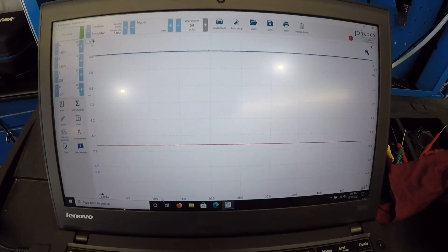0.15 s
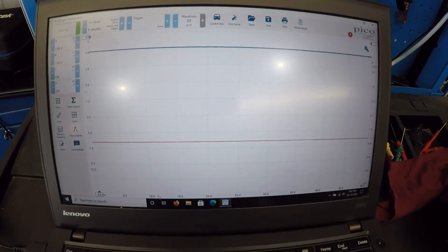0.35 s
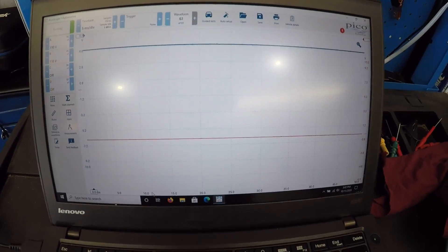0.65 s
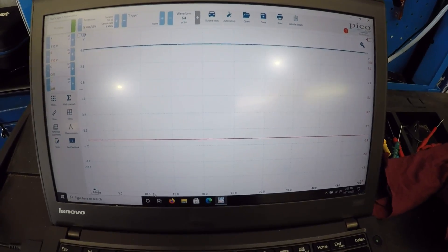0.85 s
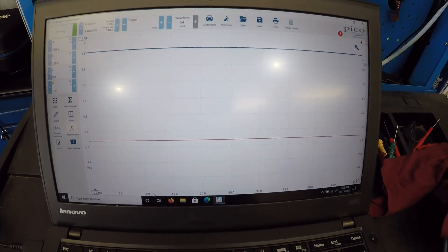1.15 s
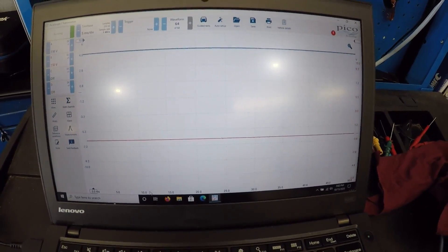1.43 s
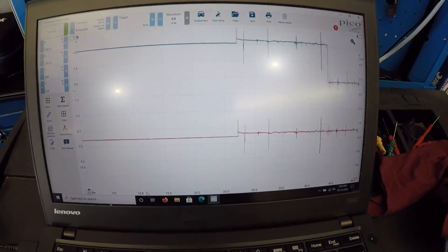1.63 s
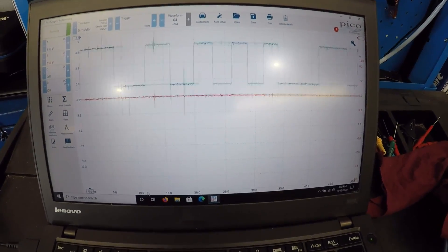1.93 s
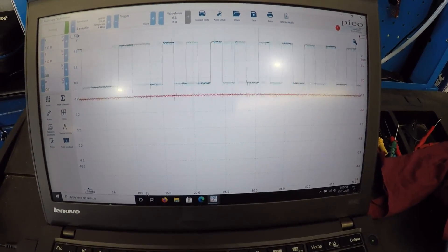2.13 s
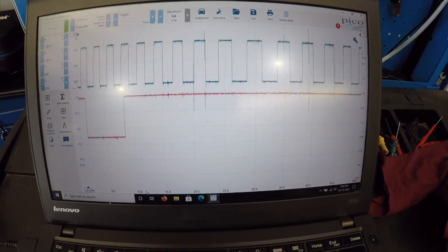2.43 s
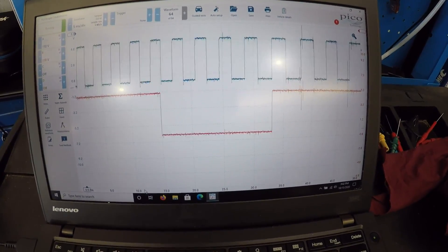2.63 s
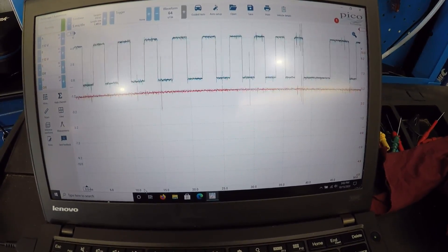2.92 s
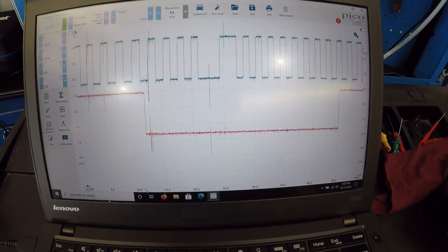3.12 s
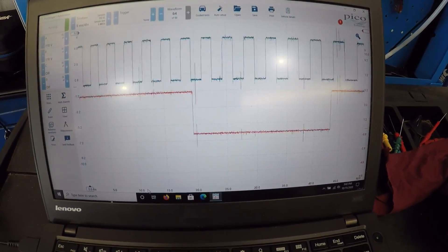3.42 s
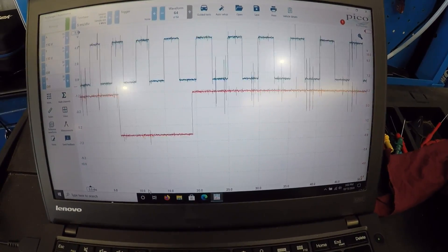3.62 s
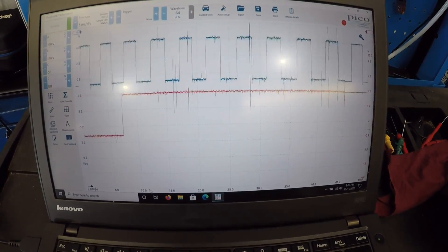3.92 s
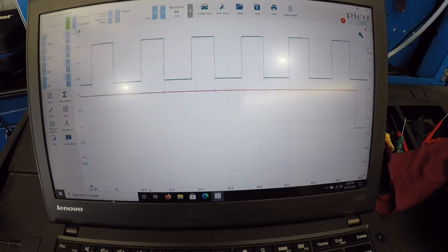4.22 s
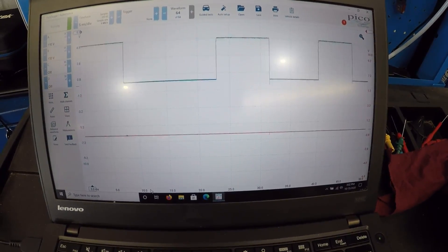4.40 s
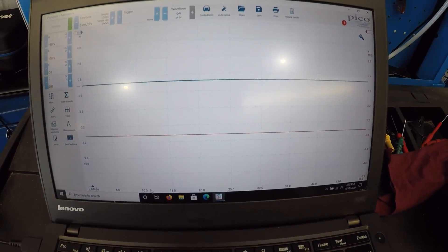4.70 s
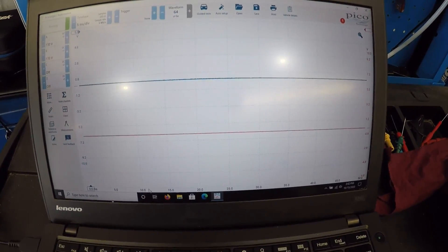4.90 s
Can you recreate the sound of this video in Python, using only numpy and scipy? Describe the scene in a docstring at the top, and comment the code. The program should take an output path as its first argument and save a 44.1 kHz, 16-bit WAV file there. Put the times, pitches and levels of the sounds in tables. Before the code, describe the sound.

A quiet fan hum opens the scene, then loud starter gears grind and groan in a pulsing rhythm. The diesel engine knocks roughly, with rattling metal and bright hiss, close to the microphone, which catches low air buffeting and short room reflections. After about two seconds it stops abruptly; a thin whine coasts down, with a brief faint rub, then two hard snaps, the first much stronger and hollow.

```python
"""A fan drone with a wavering hum and a soft rush, all filtered noise and sines, fills a workshop; a thin hiss passes.
A starter clashes into a diesel car engine (noise bursts) and groans through three compressions (gliding tones).
The engine catches with uneven knocks (short rings), tapping clatter, clanks and hiss, and air buffets the microphone.
It dies while a rotor's whine runs down (fluttering partials) and something squeals faintly.
Two sharp clicks follow close by: noise snaps that ring a hollow case."""
import sys
import numpy as np
from scipy import signal
from scipy.fft import rfft, irfft
from scipy.io import wavfile
from scipy.ndimage import uniform_filter1d

SR = 44100
rng = np.random.default_rng(int(sys.argv[2]) if len(sys.argv) > 2 else 0)


def put_to_file(sound):
    """Save the sound as 16-bit audio at rate SR, in the file named by the first command-line argument."""
    columns = np.atleast_2d(sound).T  # one column per channel
    safe = np.clip(columns, -1, 1)
    whole_steps = np.round(safe * 32767)
    wavfile.write(sys.argv[1], SR, whole_steps.astype(np.int16))


N = 222763
T = np.arange(N) / SR
FREQ = np.maximum(np.arange(N // 2 + 1) * SR / N, 1)
SIDES = np.array([[.5], [-.5]])  # left, right: half of each difference between the ports


def undb(db):
    """Decibels to gain."""
    return 10 ** (np.asarray(db) / 20)


def unit(x):
    """Scale to rms 1."""
    return x / np.sqrt(np.mean(x ** 2))


def curves(table):
    """Each column of a timed table at every sample."""
    s, *columns = np.transpose(table)
    return [np.interp(T, s, c) for c in columns]


def spectra(table):
    """Each column of a table by frequency at every bin, interpolated over log frequency."""
    hz, *columns = np.transpose(table)
    return [np.interp(np.log(FREQ), np.log(hz), c) for c in columns]


def colour(x, table, peaks=()):
    """Filter by a smooth spectrum with narrow resonances on top; rms 1."""
    db = spectra(table)[0]
    for hz, width, top in peaks:
        db = db + top * np.exp(-((FREQ - hz) / width) ** 2 * 2)
    return unit(irfft(rfft(x) * undb(db), N))


def walk(rate):
    """Smooth chance of spread 1 that changes about rate times a second."""
    return unit(irfft(rfft(rng.standard_normal(N)) * np.exp(-(FREQ / rate) ** 2), N))


def cycles(hz, waver, rate):
    """Phase of a tone whose pitch wavers by a small share."""
    return 2 * np.pi * np.cumsum(hz * (1 + waver * walk(rate))) / SR


# how sound reaches the two ports: (f/Hz, shared 0-1, left lead/rad, left minus right/dB)
PORT_PATHS = [(40, .94, 0, 2.8), (250, .97, 0, 2), (500, .75, .1, 2.8), (800, .55, -.8, -.5),
              (1200, .48, -.8, -3), (1800, .5, -.9, -1.3), (2800, .45, -.2, .5), (4200, .25, 0, 3.5),
              (5000, .08, -1, 3.5), (5700, .2, -3.1, 3), (7000, .2, -3.2, -2.4), (13000, .3, -3.2, .5)]


def air():
    """White noise at the two ports: a shared direct part and scattered parts."""
    shared, lead, pan_db = spectra(PORT_PATHS)
    noise = rfft(rng.standard_normal((3, N)))
    direct = np.sqrt(shared) * noise[0] * np.exp(1j * SIDES * lead)
    scattered = np.sqrt(1 - shared) * noise[1:]
    return irfft((direct + scattered) * undb(SIDES * pan_db), N)


def place(x, pan_db):
    """Set a sound between left and right."""
    return x * undb(SIDES * pan_db)


def burst(s, rise, hold, fall):
    """Envelope that rises, holds and dies away."""
    age = np.maximum(T - s, 0)
    return np.minimum(age / rise, 1) * np.exp(-np.clip((age - hold) / fall, 0, 40))


def bell(s, width):
    """Envelope that swells to 1 at a moment and fades again."""
    return np.exp(-((T - s) / width) ** 2)


def taps(rate, scatter_db, fall, steady):
    """Envelope of many small uneven impacts over a steady share."""
    hits = (rng.random(N) < rate / SR) * undb(scatter_db * np.clip(rng.standard_normal(N), -2, 2))
    power = signal.lfilter([1], [1, -np.exp(-2 / (fall * SR))], hits ** 2)
    return unit(np.sqrt(steady + power / power.mean()))


def reflect(x, t60, wet_db):
    """Add dense reflections, different at each port."""
    t = T[:SR // 2]
    tail = rng.standard_normal((2, len(t))) * 1000 ** (-t / t60) * (t > .004)
    tail /= np.sqrt(np.sum(tail ** 2, axis=1, keepdims=True))
    return x + undb(wet_db) * signal.fftconvolve(x, tail, axes=1)[:, :N]


# swell of the fan hum: (t/s, level/dB)
HUM_SWELL_CURVE = [(0, -1.5), (.55, 5.5), (.8, 5.5), (1.0, 7), (1.35, 7), (1.7, 9), (5, -12)]
# level of the rush, which sinks while the engine runs: (t/s, level/dB)
RUSH_SWELL_CURVE = [(0, 1), (.45, 2), (1.15, 1), (1.45, 4), (4.0, -8.5), (5.04, -1.5)]
# colour of the rush: (f/Hz, relative level/dB)
RUSH_COLOUR = [(100, -27), (160, -8), (270, -2), (330, -10), (390, -2.5), (450, -7.5), (620, -3.5),
               (1050, -4.5), (1550, -10.5), (2200, -15), (2900, -20.5), (4100, -26), (5000, -29),
               (7000, -26.5), (9500, -32), (14000, -44.5)]
# colour of the low drone: (f/Hz, relative level/dB)
DRONE_COLOUR = [(25, -32), (112, -50), (135, -7), (160, 2.5), (175, -5), (200, 3.5), (235, -3), (270, -13),
                (400, -20.5), (900, -60)]
RUSH_DB, DRONE_DB, HUM_HZ, HUM_DB = -40, -40, 194.9, -44.5  # rush and hum before their swells


def workshop():
    """Ventilation: a low drone with a wavering hum, under a soft rush."""
    phase = cycles(HUM_HZ, waver=0.0091, rate=8)
    hum_level = undb(HUM_DB + curves(HUM_SWELL_CURVE)[0] + 2.4 * walk(9.6))
    hum = hum_level * (np.sin(phase) + undb(-14.5) * np.sin(2 * phase))
    rush_level = undb(RUSH_DB + curves(RUSH_SWELL_CURVE)[0] + .5 * walk(2.3))
    rush = rush_level * colour(air(), RUSH_COLOUR)
    drone = undb(DRONE_DB) * colour(air(), DRONE_COLOUR)
    return rush + drone + place(hum, pan_db=3.0)


# colour of hissing flow: (f/Hz, relative level/dB)
HISS_COLOUR = [(1200, -28), (2600, -3.5), (3400, -4.5), (4200, -6.5), (5300, -3), (6200, 0.5), (7000, -2.5),
               (7800, -7.5), (8400, -10.5), (10000, -15.5), (11500, -28.5), (13500, -36.5), (15000, -63)]
FAINT_HISS_S, FAINT_HISS_WIDTH_S, FAINT_HISS_DB = 0.55, 0.37, -56  # centre, half length, peak


def faint_hiss():
    """A thin hiss that comes and goes while the engine still rests."""
    level = undb(FAINT_HISS_DB) * bell(FAINT_HISS_S, FAINT_HISS_WIDTH_S)
    return level * colour(air(), HISS_COLOUR)


LOAD_LAG_S, LOAD_WIDTH_S = 0.02, 0.027  # the load peaks this long after the fastest moment; half length


def gear_load(fastest_s):
    """Load on the starter in one compression, 0-1."""
    return bell(fastest_s + LOAD_LAG_S, LOAD_WIDTH_S)


GRIP_HZ, SAG_HZ_PER_S = 173.5, 2092  # gear pitch when slowest; how fast compression drags it down
UNLOADED_DB, RUN_UP_WHINE_DB = -11, -7.5  # relative to full load


def groan(grip_s, fastest_s, fastest_hz, groan_db, whine_db, boom_s):
    """The gears speed up from their grip, then sag and grow loud as the cylinder compresses."""
    run_up = np.sin(np.pi / 2 * np.clip((T - grip_s) / (fastest_s - grip_s), 0, 1)) ** 2
    hz = GRIP_HZ + (fastest_hz - GRIP_HZ) * run_up - SAG_HZ_PER_S * np.maximum(T - fastest_s, 0)
    # the flywheel's inertia smooths every change of speed
    smooth_hz = uniform_filter1d(np.maximum(hz, GRIP_HZ), size=SR // 80)
    phase = cycles(smooth_hz, waver=0.012, rate=85)
    # the teeth meet unevenly, which smears the higher partials into a growl
    growl = 0
    for k, db in enumerate([-10, -9, -12, -15], start=3):
        growl = growl + undb(db) * (.7 + .7 * walk(90)) * np.sin(k * phase)
    unloaded = undb(UNLOADED_DB) * np.sqrt(run_up) * burst(grip_s, 0.018, boom_s - grip_s, 0.047)
    force = np.maximum(gear_load(fastest_s), unloaded)
    # the octave whine already sings while the gears run up
    singing = np.maximum(force, undb(RUN_UP_WHINE_DB) * run_up * (T < fastest_s))
    low = force * (undb(groan_db) * np.sin(phase) + undb(whine_db) * growl)
    return low + singing * undb(whine_db) * np.sin(2 * phase)


# compressions on the starter, from the gears' grip to the boom at top dead centre:
# (grip t/s, clash level/dB, clash hold/s, clash treble level/dB, fastest t/s, fastest f/Hz,
#  groan level/dB, octave whine level/dB, boom t/s, boom f/Hz, boom level/dB, after-ring level/dB)
COMPRESSION_STROKES = [(1.498, -20.5, 0.015, 5.5, 1.712, 295, -16, -18, 1.766, 192, -7, -21),
                       (1.938, -19, 0.056, -15, 1.981, 337.5, -17, -17.5, 2.0, 298, -6.5, -16.5),
                       (2.114, -19, 0.036, -24, 2.153, 334, -28, -25, 2.169, 296, -7.5, -19)]
# colour of the pinion's clash: (f/Hz, relative level/dB)
PINION_COLOUR = [(40, -75), (90, -42), (170, -16), (370, -5), (480, 4), (700, 10), (900, -2), (1250, 2.5),
                 (2000, -18), (4000, -10.5), (7200, -9), (9000, -19), (14000, -44.5)]
# ringing of the block and its covers: (f/Hz, width/Hz, level/dB)
BLOCK_RESONANCES = [(303.3, 37, 8), (864, 17, 5.5), (994, 10, 4.5), (1036, 18, 6), (1130, 28, 3.5),
                    (1248, 90, 4), (1450, 35, 6), (1530, 26, 2.5), (1670, 37, 5), (1864, 90, 4),
                    (2035, 30, 6), (2184, 45, 4.5), (2287, 35, 6), (2470, 17, 2)]
# colour of the teeth grinding on: (f/Hz, relative level/dB)
GRIND_COLOUR = [(1200, -29), (2600, -2), (3600, -8), (5000, 0), (7000, -6), (12000, -38)]
START_S = 1.505
CLASH_TREBLE_HZ, CLASH_TREBLE_WIDTH_HZ = 7500, 6600  # broad treble lift or cut of each clash
GRIND_DB, GRIND_HOLD_S, GRIND_FALL_S = -33.5, 0.11, 0.065  # the teeth grind on after the first engagement
BOOM_WIDTH_S, BOOM_SAG_HZ_PER_S = 0.0095, 900
MOUNT_FALL_S, MOUNT_BEAT_HZ, MOUNT_BEAT_SHARE = 0.099, 22, 0.25


def starter():
    """The pinion clashes into the ring gear, then the gears groan under each compression."""
    clash, body = 0, 0
    teeth = air() * taps(rate=620, scatter_db=-4.0, fall=0.0018, steady=0.95)
    grit = undb(1.6 * walk(52))
    for (grip_s, clash_db, hold, treble_db, fastest_s, fastest_hz,
         groan_db, whine_db, boom_s, boom_hz, boom_db, after_db) in COMPRESSION_STROKES:
        treble = (CLASH_TREBLE_HZ, CLASH_TREBLE_WIDTH_HZ, treble_db)
        metal = colour(teeth, PINION_COLOUR, [*BLOCK_RESONANCES, treble])
        clash = clash + undb(clash_db) * burst(grip_s, 0.015, hold, 0.043) * metal
        gears = grit * groan(grip_s, fastest_s, fastest_hz, groan_db, whine_db, boom_s)
        # near top dead centre the crank almost stalls and the whole block heaves
        age = T - boom_s
        swell = bell(boom_s, BOOM_WIDTH_S)
        heave = swell * np.cos(2 * np.pi * (boom_hz - BOOM_SAG_HZ_PER_S * age / 2) * age)
        # then it throbs on in its mounts
        beat = 1 + MOUNT_BEAT_SHARE * np.cos(2 * np.pi * MOUNT_BEAT_HZ * age)
        throb = grit * burst(boom_s, 0.013, 0.024, MOUNT_FALL_S) * beat
        after_ring = throb * (1 - swell) * np.cos(cycles(boom_hz, waver=0.0518, rate=113))
        body = body + gears * (1 - swell) + undb(boom_db) * heave + undb(after_db) * after_ring
    grind_level = undb(GRIND_DB) * burst(START_S, 0.0071, GRIND_HOLD_S, GRIND_FALL_S)
    grind = grind_level * colour(teeth, GRIND_COLOUR)
    return clash + grind + reflect(place(body, pan_db=2.0), t60=0.27, wet_db=-21)


DIP_RISE_S, DIP_HOLD_S, DIP_FALL_S = 0.027, 0.033, 0.025


def dip(s):
    """Shape of the brief dip in level that follows a loud moment, 0-1."""
    return burst(s, DIP_RISE_S, DIP_HOLD_S, DIP_FALL_S)


# firings that knock:
# (t/s, ring f/Hz, ring level/dB, hold/s, rattle level/dB, rebound t/s, rebound level/dB)
FIRING_KNOCKS = [(2.323, 512, -13, 0.011, -23, 2.347, -18), (2.409, 491, -10, 0.011, -19, 2.429, -13),
                 (2.519, 488, -13, 0.0098, -19, 2.539, -13), (2.773, 525, -9, 0.014, -22, 2.793, -6.5),
                 (2.875, 486, -11.5, 0.012, -19, 2.905, -17), (3.117, 541.5, -9, 0.014, -22.5, 3.139, -9),
                 (3.214, 503.4, -15.5, 0.016, -19, 3.232, -12), (3.332, 479, -7, 0.0071, -21, 3.351, -14.5),
                 (3.448, 484, -12, .009, -20, 3.466, -17), (3.705, 514.5, -9, .014, -22.5, 3.725, -9),
                 (3.805, 496, -10.5, 0.0094, -19.5, 3.82, -11.5)]


def knock_dips():
    """The dips after all knocks, deeper for stronger and longer ones, scaled by the strongest."""
    strengths = [undb(db) * np.sqrt(hold) for s, hz, db, hold, *_ in FIRING_KNOCKS]
    dips = sum(size * dip(s) for size, (s, *_) in zip(strengths, FIRING_KNOCKS))
    return dips / max(strengths)


# how hard the engine works as it is cranked, catches and dies: (t/s, level/dB)
EFFORT_CURVE = [(1.52, -2.5), (1.6, -4.5), (1.75, -2), (1.84, -5.5), (1.92, -4), (2.0, -0.5), (2.95, -1.5),
                (3.85, -0.7), (4.01, -7), (4.22, -15.5), (4.68, -22.5), (5.04, -33)]
# the engine surges: (t/s, half length/s, hiss level/dB, draught level/dB, clatter level/dB)
ENGINE_SURGES = [(2.266, 0.1, 2, 0, 0), (2.64, 0.077, 3, 1, 1.5), (2.98, 0.07, 2.5, 3, 2),
                 (3.57, 0.042, 2.5, 7, 1.5)]
# colour of taps on the block: (f/Hz, relative level/dB)
BLOCK_COLOUR = [(40, -62), (105, -58), (140, -5), (175, 5.5), (290, -4), (370, -3.5), (520, 0.5), (720, -3),
                (900, -3), (1150, 0.5), (1450, -4.5), (2200, -4.5), (3000, -11.5), (4200, -20.5),
                (8000, -75)]
# narrow resonances of the hissing parts: (f/Hz, width/Hz, level/dB)
HISS_RESONANCES = [(5905, 170, 6.5), (6516, 72, 7.5), (7620, 170, 6.5), (9120, 160, 5), (10200, 200, 2.5)]
CLATTER_DB, LOAD_CLATTER_DB = -20.5, 1.5  # at 0 dB effort; rise under the starter's load
HISS_DB, HISS_FOLLOWS = -24, 0.81  # at 0 dB effort; dB per dB of effort
CATCH_S, CRANKING_HISS_DB = 2.27, -2  # the hiss is weaker until the engine catches
CLATTER_DIP_DB, HISS_DIP_DB, BOOM_DIP_DB = -2, -4, -3  # after knocks; the last: hiss after booms
# the clatter slackens as each compression slows the crank before a stroke
LULL_LEAD_S, LULL_WIDTH_S, LULL_DB = 0.028, 0.02, -2.5


def engine():
    """Valves, gears and injectors tap on the block; belts and intake hiss. Both follow the effort."""
    running = np.clip((T - START_S) / 0.004, 0, 1)
    cranking = np.clip((CATCH_S - T) / 0.09, 0, 1)
    effort_db, after_knock = curves(EFFORT_CURVE)[0], knock_dips()
    after_boom = sum(dip(boom_s) for *_, boom_s, hz, db, after_db in COMPRESSION_STROKES)
    load = sum(gear_load(fastest_s) for _, _, _, _, fastest_s, *_ in COMPRESSION_STROKES)
    # a compression's row starts at the gears' grip, a knock's at the firing
    strokes = [*COMPRESSION_STROKES, *FIRING_KNOCKS]
    lull = sum(bell(s - LULL_LEAD_S, LULL_WIDTH_S) for s, *_ in strokes)
    hiss_surge_db = sum(db * bell(s, width) for s, width, db, *_ in ENGINE_SURGES)
    clatter_surge_db = sum(db * bell(s, width) for s, width, *_, db in ENGINE_SURGES)

    tapping = air() * taps(rate=220, scatter_db=5, fall=0.013, steady=3.9)
    clatter = colour(tapping, BLOCK_COLOUR, BLOCK_RESONANCES)
    clatter_db = CLATTER_DB + effort_db + LOAD_CLATTER_DB * load + LULL_DB * lull
    clatter_db = clatter_db + CLATTER_DIP_DB * after_knock + clatter_surge_db

    # the hiss rings in its narrow resonances more while the flow is strong
    flow = air() * taps(rate=170, scatter_db=-7.0, fall=0.0036, steady=16.0)
    ringing = np.clip(undb(0.39 * effort_db), 0, 1)
    hiss = ringing * colour(flow, HISS_COLOUR, HISS_RESONANCES) + (1 - ringing) * colour(flow, HISS_COLOUR)
    hiss_db = HISS_DB + HISS_FOLLOWS * effort_db + CRANKING_HISS_DB * cranking + hiss_surge_db
    hiss_db = hiss_db + HISS_DIP_DB * after_knock + BOOM_DIP_DB * after_boom
    return running * (clatter * undb(clatter_db) + hiss * undb(hiss_db))


# loose metal that clanks around the main strokes: (t/s, ring f/Hz, ring level/dB, rattle level/dB, hold/s)
LOOSE_CLANKS = [(1.508, 1160, -22, -31, 0.0065), (1.744, 1249, -30.5, -28, 0.033),
                (1.859, 1093, -23.5, -40, 0.017), (2.12, 1220, -28.5, -24.5, .012),
                (2.255, 1235, -23, -31, 0.0089), (2.326, 1228, -17.5, -35, 0.011),
                (2.468, 522, -26, -21.5, 0.014), (2.563, 562, -23, -21, 0.011),
                (2.703, 1240, -26, -27, 0.0091), (2.838, 518, -28, -23, 0.013),
                (3.111, 1127, -24, -36, 0.0066), (3.18, 520, -20.5, -24, 0.008),
                (3.243, 510, -27, -27, 0.0057), (3.29, 1120, -28, -31, .015), (3.38, 508, -26, -27, 0.021),
                (3.489, 578, -28, -23, 0.012), (3.762, 525, -25, -25, 0.015), (3.829, 520, -24, -28, 0.011)]
# colour of rattling metal: (f/Hz, relative level/dB)
RATTLE_COLOUR = [(80, -50), (300, -17), (460, 8), (600, 8), (750, -2), (1050, 3), (1300, -2), (1750, 2.5),
                 (2400, -18), (4500, -29), (10000, -66)]


def clanks():
    """Loose metal is thrown back: a short gritty ring in a rattle."""
    tone, shake = 0, 0
    for s, hz, db, rattle_db, hold in LOOSE_CLANKS:
        blow = burst(s, 0.0037, hold, 0.012)
        tone = tone + undb(db) * blow * np.sin(2 * np.pi * hz * (T - s))
        shake = shake + undb(rattle_db) * blow
    rattle = shake * colour(air(), RATTLE_COLOUR, BLOCK_RESONANCES)
    gritty = tone * undb(1.7 * walk(150))
    return reflect(place(gritty, pan_db=5.0), t60=0.22, wet_db=-20) + rattle


# the engine lurches in its mounts under the starter: (t/s, half length/s, f/Hz, level/dB)
MOUNT_LURCHES = [(1.531, 0.013, 179.6, -20.5), (1.81, 0.0069, 213, -16), (1.855, 0.0087, 200, -16.5)]


def lurch():
    """The block swings in its mounts with a low throb."""
    throb = 0
    for s, width, hz, db in MOUNT_LURCHES:
        throb = throb + undb(db) * bell(s, width) * np.sin(cycles(hz, waver=0.027, rate=77))
    return place(throb, pan_db=2.0)


# moving air on the microphone, before the surges: (t/s, level/dB)
DRAUGHT_CURVE = [(2.2, -55), (2.34, -36.5), (2.52, -38.5), (2.62, -29.5), (3.83, -25), (4.07, -29.5),
                 (4.4, -33), (4.75, -32.5)]
# colour of the buffeting: (f/Hz, relative level/dB)
BUFFET_COLOUR = [(12, -3.5), (32, -1.5), (48, -2), (65, -8), (110, -8.5), (200, -13), (290, -22.5),
                 (400, -53), (1000, -68)]


def draught():
    """Air stirred by the engine buffets the microphone as low noise, lifted by the later surges."""
    surge_db = sum(db * bell(s, width) for s, width, _, db, _ in ENGINE_SURGES)
    level = undb(curves(DRAUGHT_CURVE)[0] + surge_db)
    onset = np.clip((T - DRAUGHT_CURVE[0][0]) / 0.042, 0, 1)
    return colour(air(), BUFFET_COLOUR) * level * onset


# harmonics of a knock's ring, from the first up:
# (level/dB, left minus right/dB, left lead/rad, roughness 0-1)
KNOCK_HARMONICS = [(0, 3.4, -0.055, 0.08), (-12, -12, -0.82, 0.48), (-12, 0, -1.3, 0.5)]
KNOCK_SAG_PER_S = 0.93  # share of its pitch that a knock's ring loses per second
REBOUND_WIDTH_S = 0.0046  # half length of a knock's rebound


def knocks():
    """Each firing drives a hollow ring near 500 Hz that rebounds once and stops short, and shakes metal."""
    rings, shake = 0, 0
    drift = cycles(1, waver=0.024, rate=310)
    grit = [(1 - rough / 2) + rough * walk(170) for *_, rough in KNOCK_HARMONICS]
    for s, hz, db, hold, rattle_db, rebound_s, rebound_db in FIRING_KNOCKS:
        age = np.clip(T - s, 0, .1)
        phase = hz * (drift - np.interp(s, T, drift) - np.pi * KNOCK_SAG_PER_S * age ** 2)
        first = undb(db) * burst(s, 0.0055, hold, 0.0018)
        rebound = undb(rebound_db) * bell(rebound_s, REBOUND_WIDTH_S)
        blow = np.maximum(first, rebound)
        for k, (order_db, pan_db, lead, _) in enumerate(KNOCK_HARMONICS, start=1):
            partial = np.sin(k * phase + SIDES * lead)
            rings = rings + place(undb(order_db) * blow * grit[k - 1] * partial, pan_db)
        shake = shake + undb(rattle_db) * burst(s, 0.0078, 0.027, 0.048)
    # the loose metal rattles on after the ring
    jangle = air() * taps(rate=340, scatter_db=2.0, fall=0.0069, steady=0.82)
    rattle = shake * colour(jangle, RATTLE_COLOUR, BLOCK_RESONANCES)
    return reflect(rings, t60=0.6, wet_db=-25) + rattle


# partials of the rotor's whine: (multiple, level at top speed/dB, roughness at top speed 0-1, fully out t/s)
WHINE_PARTIALS = [(1, 6, 0.45, 4.12), (3, 4.5, .3, 3.98), (4, -5.5, .55, 4.0), (5, -20, .5, 4.0)]
# overall level of the whine: (t/s, level/dB)
WHINE_CURVE = [(3.8, -70), (3.97, -52), (4.12, -47), (4.3, -47), (4.45, -50), (4.55, -51), (4.72, -50.5),
               (4.82, -59), (5.04, -77)]
# a freewheeling rotor spins up to its top speed, then coasts down
ROTOR_TOP_S, ROTOR_TOP_HZ, SPIN_UP_PER_S, COAST_PER_S = 4.01, 2627, .11, .245
FRAY_PER_S = 0.8  # roughness gained per second as the rotor slows and its lines fray into hiss
WHINE_EMERGE_S, WHINE_FLUTTER_DB, WHINE_FLUTTER_HZ = .3, 3, 16


def whine():
    """A rotor coasts down: each partial is a fluttering line in a skirt of rushing air."""
    age = T - ROTOR_TOP_S
    speed = np.exp(np.minimum(SPIN_UP_PER_S * age, -COAST_PER_S * age))
    phase = cycles(ROTOR_TOP_HZ * speed, waver=0.005, rate=44)
    tone = 0
    for k, order_db, rough, out_s in WHINE_PARTIALS:
        rough = np.clip(rough + FRAY_PER_S * np.maximum(age, 0), 0, 1)
        body = np.sqrt(1 - rough) * undb(1.7 * walk(40)) + np.sqrt(rough) * walk(90 * k)
        # each line emerges in its own time and flutters
        emerging = np.clip(1 + (T - out_s) / WHINE_EMERGE_S, 0, 1)
        flutter = unit(undb(WHINE_FLUTTER_DB * np.tanh(walk(WHINE_FLUTTER_HZ))))
        # the upper partials fade first as the rotor slows
        level = undb(order_db) * speed ** (1.6 * (k - 1))
        tone = tone + level * body * emerging * flutter * np.sin(k * phase)
    return reflect(place(tone * undb(curves(WHINE_CURVE)[0]), pan_db=0.0), t60=0.48, wet_db=3.5)


# a faint short squeal as the engine comes to rest
SQUEAL_S, SQUEAL_WIDTH_S, SQUEAL_HZ, SQUEAL_SAG_PER_S, SQUEAL_DB = 4.68, 0.095, 1310, 1.6, -46


def squeal():
    """Something rubs briefly with a falling pitch."""
    age = np.clip(T - SQUEAL_S, -.5, .5)
    level = undb(SQUEAL_DB + 2.0 * walk(50)) * bell(SQUEAL_S, SQUEAL_WIDTH_S)
    hz = SQUEAL_HZ * np.exp(-SQUEAL_SAG_PER_S * age)
    tone = level * np.sin(cycles(hz, waver=0.0346, rate=150))
    return reflect(place(tone, pan_db=3), t60=0.22, wet_db=1)


CONTACT_S = 0.00066  # time constant with which a click's push builds up


def ring(modes, s):
    """Modes struck at one moment, each a decaying sine."""
    age = np.clip(T - s, 0, 1)
    tones = sum(undb(db) * np.sin(2 * np.pi * hz * age) * 1000 ** (-age / t60) for hz, db, t60 in modes)
    return (1 - np.exp(-age / CONTACT_S)) * tones


# snaps of the two clicks, the first a close pair:
# (t/s, snap level/dB, brightness f/Hz, case knock level/dB, thump level/dB)
CLICK_SNAPS = [(4.844, -28, 6000, -50, -60), (4.8491, -14.5, 7470, -11, -15.5),
               (4.9414, -22, 7040, -47, -27)]
# colour of a snap: (share of its brightness frequency, relative level/dB)
SNAP_COLOUR = [(.25, -14.5), (.55, -20), (.85, -3), (1, 3), (1.2, -8), (1.5, -26), (2, -31)]
# hollow case that a click rings: (f/Hz, level/dB, t60/s)
CASE_RESONANCES = [(503, -14, .022), (700, -7, 0.014), (837, 2, 0.015), (1220, -7, 0.016),
                   (2310, -17, .012), (3180, -9.5, 0.0078), (5450, -16, .02)]
# low thump under a click: (f/Hz, level/dB, t60/s)
THUMP_RESONANCES = [(53.3, 1, 0.12), (187, -3.5, 0.051), (265, -5, 0.05), (400, -13, .04)]


def clicks():
    """Hard little snaps close by, the strongest one with a hollow knock and a thump."""
    out, noise = 0, air()
    for s, snap_db, hz, case_db, thump_db in CLICK_SNAPS:
        snap = colour(noise, [(hz * share, db) for share, db in SNAP_COLOUR])
        out = out + undb(snap_db) * burst(s, 0.0011, 0.00094, 0.003) * snap
        case = undb(case_db) * ring(CASE_RESONANCES, s)
        thump = undb(thump_db) * ring(THUMP_RESONANCES, s + 0.0026)
        out = out + place(case + thump, pan_db=4.5)
    return reflect(out, t60=0.11, wet_db=-33)


def scene():
    """All sources at the two ports."""
    resting = workshop() + faint_hiss()
    running = starter() + engine() + clanks() + lurch() + draught() + knocks()
    return resting + running + whine() + squeal() + clicks()


TOP_HZ = 14200


def record(dry):
    """A steep low-pass cuts the top."""
    return signal.sosfilt(signal.ellip(8, .2, 70, TOP_HZ, fs=SR, output="sos"), dry)


dry = scene()
out = record(dry)
put_to_file(out)
```